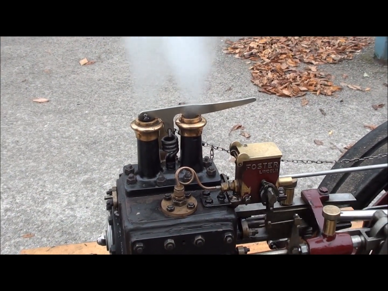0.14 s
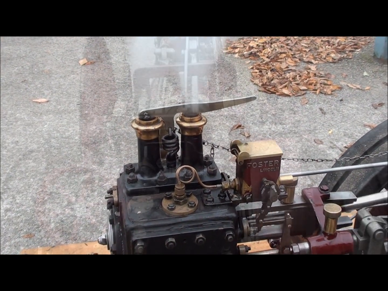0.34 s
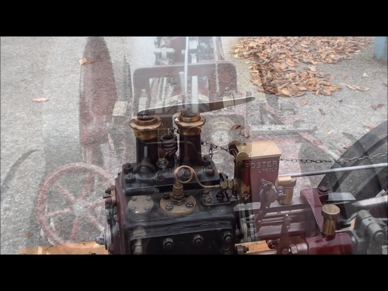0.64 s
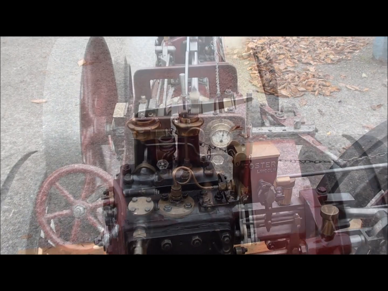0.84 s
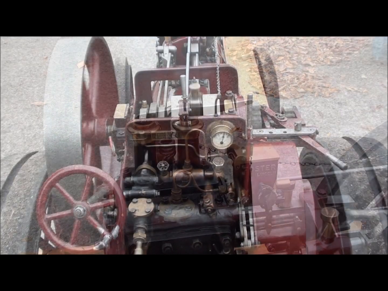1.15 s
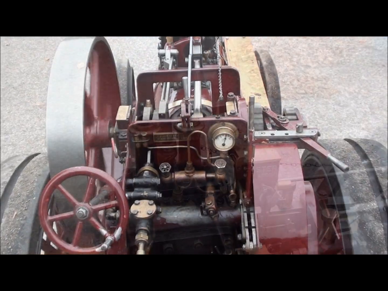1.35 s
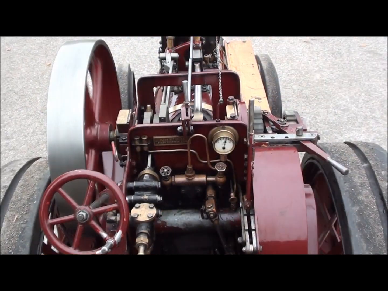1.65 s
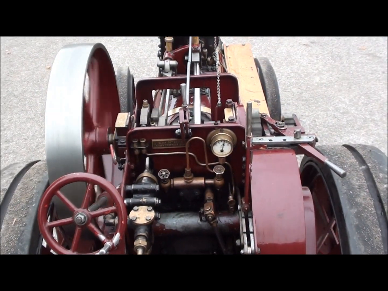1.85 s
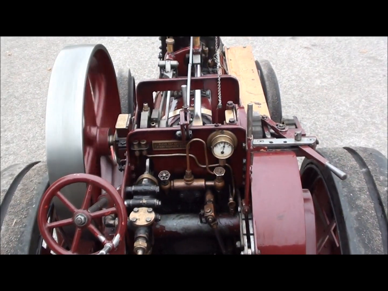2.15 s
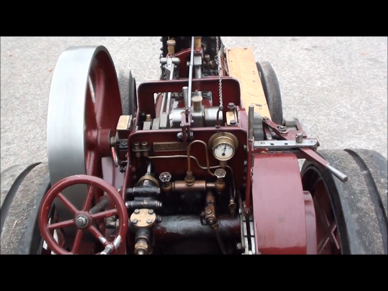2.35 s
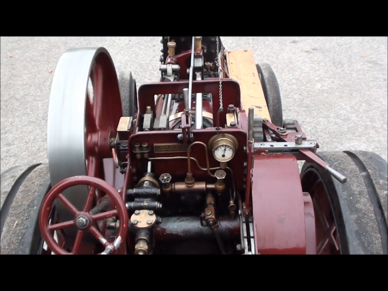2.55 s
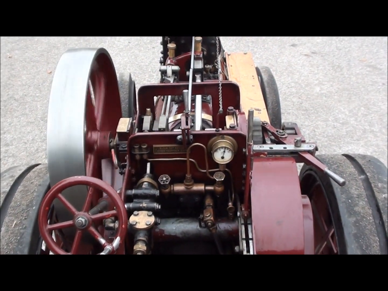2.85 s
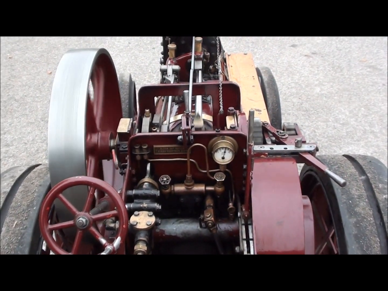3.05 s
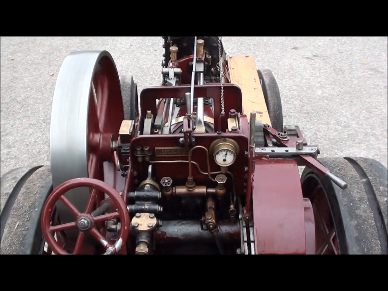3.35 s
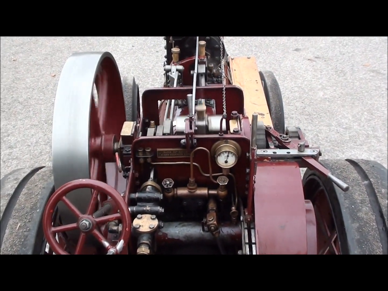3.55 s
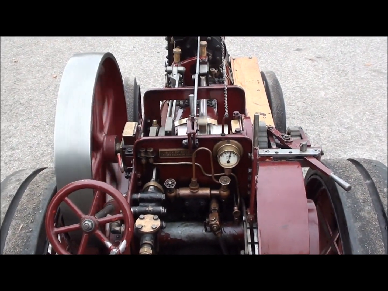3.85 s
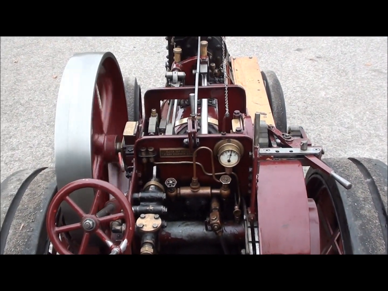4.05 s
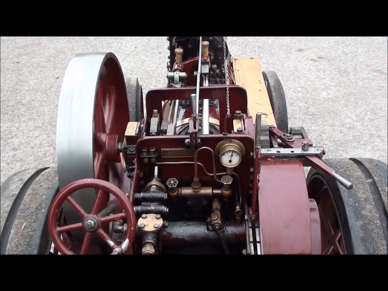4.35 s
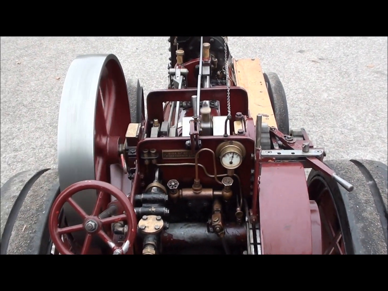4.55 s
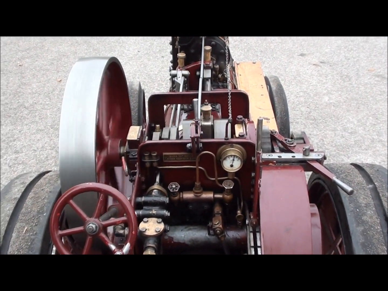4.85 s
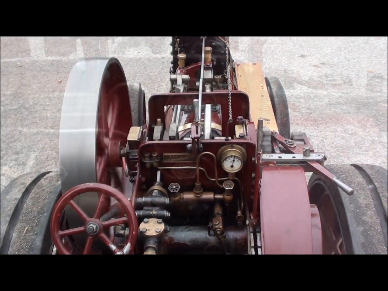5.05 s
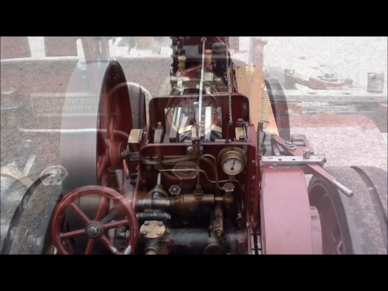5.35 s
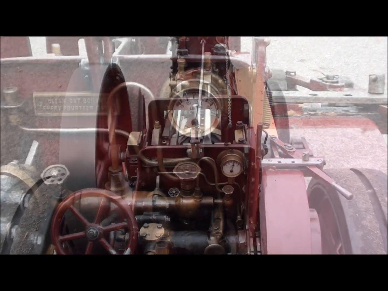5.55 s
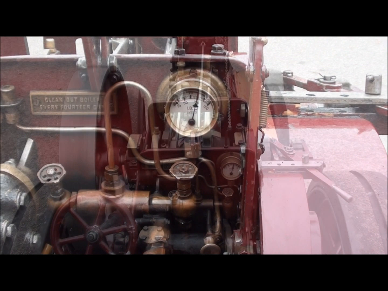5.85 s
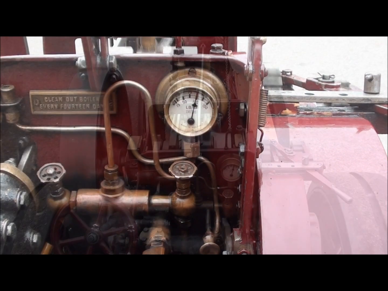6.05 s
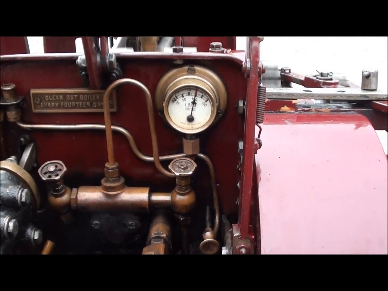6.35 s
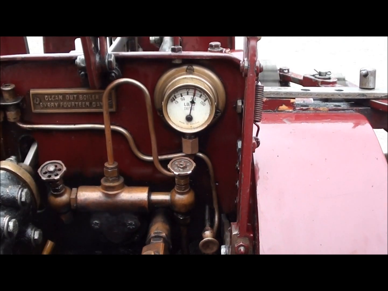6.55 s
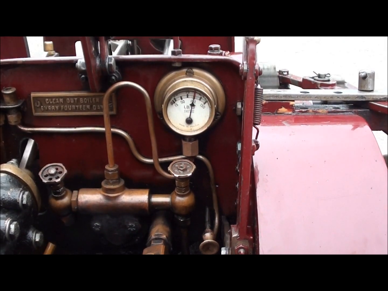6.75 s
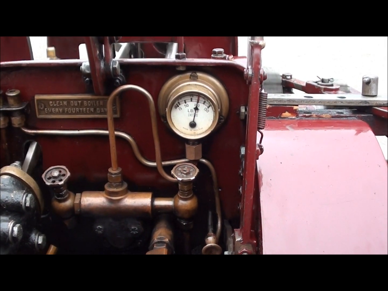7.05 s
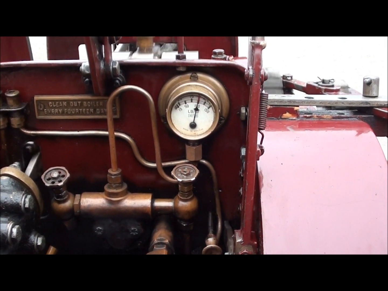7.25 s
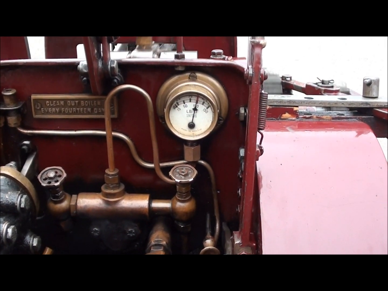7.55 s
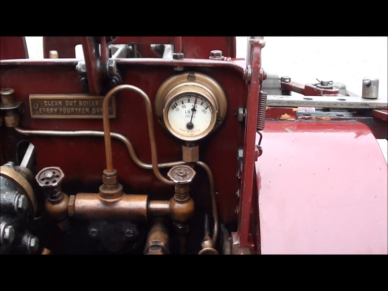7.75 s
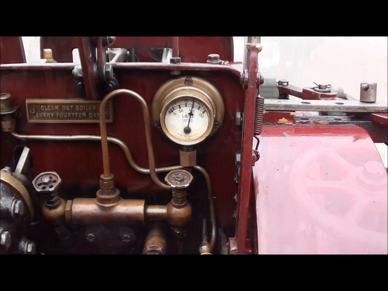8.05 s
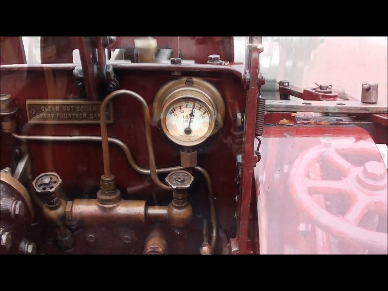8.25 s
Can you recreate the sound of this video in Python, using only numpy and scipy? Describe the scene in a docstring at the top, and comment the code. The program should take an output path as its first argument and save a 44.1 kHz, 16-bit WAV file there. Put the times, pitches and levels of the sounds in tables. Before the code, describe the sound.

Steam hisses steadily from a small outdoor steam engine while its crank knocks in quick, regular metallic clatter, heard from three successive close positions.

```python
"""Steam hisses from the safety valves of a small traction engine ticking over outdoors, its crank knocking.
Steam is shaped random spectra; knocks return at fixed crank angles and ring decaying modes of the iron frame.
Three places are heard in turn, beside the valves, behind the engine and close to the footplate, each
overlapping the next for a second. Breeze is low noise, thuds are low sine bumps; near the footplate a loose
plate clanks, ringing the same modes."""
import sys
import numpy as np
from scipy import signal
from scipy.fft import rfft, irfft, next_fast_len
from scipy.io import wavfile
from scipy.ndimage import uniform_filter1d

SR = 44100
rng = np.random.default_rng(int(sys.argv[2]) if len(sys.argv) > 2 else 0)


def materialize(psi):
    """Save the field psi as 16-bit PCM at rate SR to the path in sys.argv[1].

    A 1-D psi becomes a single channel; in a 2-D psi each row is a channel.
    """
    bounded = np.clip(np.atleast_2d(psi).T, -1, 1)
    quanta = np.round(bounded * 32767).astype(np.int16)
    wavfile.write(sys.argv[1], SR, quanta)


N = 370881


def gain_of(db):
    """Decibels to amplitude gain."""
    return 10 ** (np.asarray(db) / 20)


def evened(x):
    """Scales to rms 1."""
    return x / np.sqrt(np.mean(x ** 2) + 1e-20)


def read(points, hz):
    """Interpolates a spectrum on a log-frequency axis."""
    point_hz, value = np.transpose(points)
    return np.interp(np.log(hz + 1), np.log(point_hz + 1), value)


def add(mix, start_s, sound):
    """Adds a sound at a time in seconds; what lies before zero is lost."""
    at = round(start_s * SR)
    part = mix[max(at, 0):][:max(len(sound) + min(at, 0), 0)]
    part += sound[max(-at, 0):][:len(part)]


# Steam jet. Each row: time in seconds, level in dB, treble against the body in dB.
VALVES_JET = [(0, -11, -1.5), (.4, -11.5, -1.5), (.7, -10, -2), (1.1, -14, 0), (1.55, -12, -2.5),
              (1.77, -10, -1.8)]
BEHIND_JET = [(.76, -10.5, 0.67), (1.4, -12, .8), (1.8, -11.5, 0.58), (2.55, -14, .9), (2.95, -13, .9),
              (3.08, -13.5, -0.94), (3.85, -11.7, 0.93), (4.12, -13.5, -0.39), (5.1, -12.8, -.7),
              (5.4, -12.5, -0.82), (6.47, -12.5, -0.42)]
CLOSE_JET = [(5.45, -15.5, .9), (6.5, -15, -0.24), (6.95, -12, -.7), (7.15, -14.5, 0.61), (7.6, -13, -1),
             (7.9, -13.5, -1.04), (8.15, -15.5, -2.4), (8.41, -14.5, -.3)]
# Jet colour, down to the rumble of fire and gears. Each row: frequency in Hz, relative density in dB.
VALVES_HISS = [(18, -66), (30, -39), (360, -17), (493, -22), (729, -14.5), (1200, -16), (2020, -4.5),
               (2430, -7), (3330, -1.5), (4550, -1), (5910, -10), (7100, -2), (8980, -9.5), (13000, -11.5),
               (15600, -13)]
BEHIND_HISS = [(18, -57), (30, -20.5), (250, -8), (308, -14), (370, -8.5), (493, -12), (711, -9),
               (1600, -9), (2560, -2), (3600, -5.5), (5610, -1), (6070, -1), (10200, -7), (13300, -16),
               (15600, -12)]
CLOSE_HISS = [(18, -57), (30, -31), (225, -6), (370, -10), (480, -13.5), (749, -9.5), (1110, -13),
              (2080, -6), (2370, -9), (2700, -10), (3160, -10.5), (4550, -6.5), (5050, -6.5), (5610, -4),
              (15600, -20.5)]
# Bands that nearby plates and the ground lift or cancel. Each row: centre in Hz, width in Hz, change in dB.
VALVES_BANDS = [(2110, 460, -3), (2480, 260, -8), (3010, 830, 3), (4500, 530, 2), (6000, 520, 1),
                (6660, 870, 3), (8900, 900, -1), (10800, 900, 3), (13200, 900, 4)]
BEHIND_BANDS = [(384, 66, 5), (470, 69, -10), (1000, 840, -0.5), (2680, 360, 0.5), (3280, 450, 4),
                (3880, 300, 2), (4590, 1060, 5), (5600, 350, 3.5), (6050, 160, -4), (6470, 410, 1.5),
                (7300, 490, 3.5), (7970, 260, 4.5), (10000, 1000, -3), (12000, 500, 1), (13150, 1300, 7.5)]
CLOSE_BANDS = [(496, 77, -1), (1200, 820, -1.5), (2140, 590, 3), (2400, 105, -14), (2740, 280, 5.5),
               (3620, 300, -2.5), (3790, 180, 5), (4200, 150, -9), (4530, 460, 6.5), (5680, 300, 2.5),
               (5900, 210, -7), (6550, 330, -4), (7750, 300, 1.5), (10200, 1500, -3.5), (13300, 900, 2)]
# Steam spread between left and right. Each row: frequency in Hz, left-right likeness (0 to 1), left minus right
# in dB.
VALVES_SPREAD = [(90, .97, 0), (350, .96, -.3), (1000, .92, .7), (1500, .9, .6), (2600, .94, 1.4),
                 (3400, .98, 2.2), (4600, .975, 3.9), (5500, .92, 2.3), (6100, .86, 0), (6700, .96, 0),
                 (7900, .997, 0), (15000, .999, 0)]
BEHIND_SPREAD = [(90, .95, 0), (350, .985, 0), (1000, .965, .8), (1500, .98, .1), (2600, .993, .1),
                 (3400, .99, .3), (4000, .97, .9), (5000, .94, 3.8), (5600, .965, 1.4), (6100, .94, .9),
                 (6700, .96, 0), (7900, .997, 0), (15000, .999, 0)]
CLOSE_SPREAD = [(90, .9, .3), (350, .96, .4), (1000, .87, 1.6), (1500, .87, .9), (2000, .91, 1.9),
                (3300, .83, 1.8), (4500, .95, 2.9), (5000, .86, 3.2), (5600, .93, 2.1), (6200, .9, .3),
                (7300, .92, -.4), (8000, .985, 0), (15000, .998, 0)]


def steam(jet, hiss, bands, ports, patchy_db, flicker_db):
    """Turbulent noise as random short-time spectra with drifting patches and a fast shared flicker."""
    frame, hop = 1024, 256  # samples
    frames, hz = N // hop + 5, np.fft.rfftfreq(frame, 1 / SR)
    t = np.arange(frames) * hop / SR
    left_re, left_im, other_re, other_im, patches = rng.standard_normal((frames, len(hz), 5)).T
    patches = uniform_filter1d(patches, size=30, axis=0)
    patches = evened(uniform_filter1d(patches, size=6, axis=1))
    flicker = evened(uniform_filter1d(rng.standard_normal(frames), size=2))

    colour_db = read(hiss, hz)
    for centre_hz, width_hz, db in bands:
        colour_db = colour_db + db * np.exp(-(2 * (hz - centre_hz) / width_hz) ** 2)
    body = (hz > 2000) & (hz < 8000)  # the jet level refers to this band
    colour_db -= 10 * np.log10(np.sum(gain_of(colour_db[body]) ** 2))

    jet_s, level_db, treble_db = np.transpose(jet)
    treble = np.clip((hz - 6000) / 4000, 0, 1)[:, None]
    fizz = np.clip((hz - 1500) / 5000, 0, 1)[:, None]  # the flicker grows with pitch
    field_db = colour_db[:, None] + np.interp(t, jet_s, level_db) + patchy_db * patches
    field_db += treble * np.interp(t, jet_s, treble_db) + fizz * flicker_db * flicker

    port_hz, *columns = np.transpose(ports)
    same, lean_db = (np.interp(np.log(hz + 1), np.log(port_hz), column)[:, None] for column in columns)
    left = left_re + 1j * left_im
    other = other_re + 1j * other_im
    spectra = np.array([left, same * left + np.sqrt(1 - same ** 2) * other])
    spectra *= gain_of([lean_db / 2, -lean_db / 2])
    spectra *= gain_of(field_db) * np.sqrt(3 / 2)  # overlap-add averages frames
    return signal.istft(spectra, nperseg=frame, noverlap=frame - hop)[1][:, :N]


# Modes of frame, firebox plates and motion work. Each row: frequency in Hz, 60 dB decay time in seconds.
FRAME = [(170, 0.15), (215, 0.18), (245, 0.28), (283, 0.16), (345, 0.12), (385, 0.15), (500, 0.047),
         (630, 0.053), (680, 0.078), (750, 0.086), (800, 0.072), (900, 0.09), (960, 0.13), (1090, 0.028),
         (1200, 0.048), (1260, 0.026), (1430, 0.078), (1600, 0.051), (1740, 0.016)]


def knock(chatter_s, rebound_s, rebound_db, ring_db):
    """Bearing slack closes with a short chatter and rebounds once; returns one row a mode."""
    hz, t60_s = np.transpose(FRAME)[:, :, None]
    wait, phase_turns = rng.random((2, len(hz), 1))  # each mode catches its own moment of the chatter
    delay_s = np.array([0, rebound_s])[:, None, None]
    t = np.maximum(np.arange(SR // 4) / SR - delay_s - .5 * chatter_s * wait, 0)
    rise = 1 - np.exp(-t / (0.052 * chatter_s))
    fall = gain_of(-60 * np.maximum(t - chatter_s, 0) / t60_s)
    blow, rebound = rise * fall * np.sin(2 * np.pi * (hz * t + phase_turns))
    return gain_of(ring_db)[:, None] * (blow + gain_of(rebound_db) * rebound)


# Knocks in a turn. Each row: share of the turn, chatter in seconds, rebound delay in seconds, rebound in dB.
KNOCKS = [(-.015, .01, .03, -16), (.122, 0.0056, 0.016, -2.5), (.48, .012, 0.018, -19),
          (0.665, 0.0052, .018, -8.5), (.26, .015, .02, -8.5), (.93, .012, .012, -1)]
# Force on the frame. Each row: one knock; each column: relative level of one mode in dB.
RING = [(-55, -29, -32, -26.5, -22, -19, -39, -33, -31.5, -47, -37, -27.5, -31, -26, -29, -24.5, -30.5, -29, -24),
        (-35, -26.5, -37, -16, -33, -22.5, -24.5, -24, -24, -27.5, -23.5, -27, -23.5, -22.5, -23.5, -31, -29, -22, -24),
        (-45, -29, -31.5, -28, -22, -32, -50, -30.5, -30.5, -33, -33, -34, -37, -24.5, -22.5, -26, -23, -36, -24),
        (-34, -33, -28.5, -25.5, -35, -21, -33, -19, -25.5, -24, -16, -29, -24.5, -32, -35, -46, -32, -27, -23),
        (-37, -37, -36, -34, -31.5, -28.5, -60, -38, -38, -36.5, -44, -40, -62, -59, -44, -47, -49, -54, -57),
        (-47, -48, -38, -46, -53, -38.5, -60, -48, -47, -36, -32.5, -37, -28, -52, -29.5, -34, -31, -38, -45)]
# Crank progress as heard at a place. Each row: time in seconds, turns done.
VALVES_TURNS = [(-.239, 0), (1.978, 7)]
BEHIND_TURNS = [(.811, 0), (3.301, 8), (5.491, 15), (6.735, 19)]
CLOSE_TURNS = [(5.416, 0), (8.548, 10)]
# How each knock arrives at a place. Each row: level in dB, tilt in dB per octave about 600 Hz.
VALVES_REACH = [(-13, -5), (-3.5, 0.5), (-14, .1), (-6.5, 0), (-20, .1), (-20, .1)]
BEHIND_REACH = [(-1.1, .1), (0.17, 0.091), (-0.25, .1), (-0.56, .1), (1.2, 0.11), (-0.16, .1)]
CLOSE_REACH = [(0.5, 1), (-0.1, -2.5), (0.5, -1.5), (-2.4, -2), (-3, -3.5), (2, -4.2)]
# How a place colours the ring. Each row: frequency in Hz, change in dB.
VALVES_IRON = [(170, -12), (215, -32), (283, -12.5), (385, -10), (500, 1), (630, -1), (750, 6.5),
               (800, -16), (960, -4), (1260, -20), (1600, 2), (1740, -33)]
BEHIND_IRON = [(170, 0), (1740, 0)]
CLOSE_IRON = [(170, 9.3), (215, 7.4), (283, 2.7), (345, 4.1), (385, 3.6), (500, 4.7), (650, 8.1),
              (800, 8.7), (900, 4.5), (1200, 1.1), (1430, 7), (1740, 4.3)]


def crank(turns, reach, iron):
    """Knocks return at the same crank angles, each mode a little harder or softer each turn."""
    out = np.zeros(N)
    turn_s, done = np.transpose(turns)
    hz = np.transpose(FRAME)[0]
    iron_db, octaves = read(iron, hz), np.log2(hz / 600)
    for (share, *shape), ring_db, (reach_db, tilt_db) in zip(KNOCKS, RING, reach):
        modes = knock(*shape, iron_db + ring_db + reach_db + tilt_db * octaves)
        starts_s = np.interp(np.arange(done[-1]) + share, done, turn_s)
        chance_db = 2.0 * rng.standard_normal((len(starts_s), len(FRAME)))
        for start_s, each_db in zip(starts_s, chance_db):
            add(out, start_s, gain_of(each_db) @ modes)
    # loose joints keep making and breaking contact, which roughens the ring
    rattle = uniform_filter1d(rng.standard_normal(N), size=90)
    rattle = evened(uniform_filter1d(rattle, size=90))
    rough = 0.29
    return out * (1 + rough * rattle) / np.sqrt(1 + rough ** 2)


def limited(x, threshold_db, depth, detector_fall_db_per_s):
    """The recorder's gain control takes off a share (depth) of the peak-held excess in dB."""
    power = uniform_filter1d((x ** 2).mean(0), size=260)
    power_db = 10 * np.log10(abs(power) + 1e-12)
    fall_db = np.arange(N) * detector_fall_db_per_s / SR
    held_db = np.maximum.accumulate(power_db + fall_db) - fall_db
    excess_db = np.maximum(held_db - threshold_db, 0)
    return x / gain_of(depth * uniform_filter1d(excess_db, size=120))


def place(heard_s, engine, jet, threshold_db):
    """One listening place: engine and steam share the gain control, gated on and off within a few ms."""
    t = np.arange(N) / SR
    from_s, to_s = heard_s
    gate = np.clip(np.minimum(t - from_s, to_s - t) / 0.0029 + .5, 0, 1)
    late = np.roll(engine, 9)  # a slightly longer path to the right port
    pair = np.array([engine, 0.84 * engine + 0.13 * late])
    return gate * limited(pair + jet, threshold_db, depth=0.47, detector_fall_db_per_s=242)


# Wind noise colour. Each row: frequency in Hz, relative level in dB.
BREEZE_COLOUR = [(15, -38), (40, -15), (70, 4), (130, 7), (240, 1), (450, -38)]
# Gusts on the microphone. Each row: peak time in seconds, level in dB, rise and fall time constants in seconds.
GUSTS = [(.9, -38.5, 0.062, 0.55), (3.15, -32, .12, 0.044), (5.6, -30, 0.093, 0.27), (6.2, -36, .15, .4),
         (7.47, -32, .15, .6)]


def breeze():
    """Lumpy low pressure swings, partly unrelated at the two ports, swelling with each gust."""
    size = next_fast_len(N)
    hz, t = np.fft.rfftfreq(size, 1 / SR), np.arange(N) / SR
    spectra = rfft(rng.standard_normal((3, size))) * gain_of(read(BREEZE_COLOUR, hz))
    shared, left, right = irfft(spectra, size)[:, :N]
    level = gain_of(-75)  # calm air
    for peak_s, db, rise_s, fall_s in GUSTS:
        swell = np.minimum((t - peak_s) / rise_s, (peak_s - t) / fall_s)
        level = level + gain_of(db) * np.exp(swell)
    return evened(shared + np.array([left, right])) * level


# Dull thuds. Each row: start in seconds, envelope peak in dB before panning, pitch in Hz, rise in seconds.
THUDS = [(.088, -38, 92, .011), (.406, -38, 92, .011), (.712, -38, 92, .008), (3.139, -23, 75, .007)]


def thuds():
    """Soft low sine bumps, a little stronger on the left."""
    out, t = np.zeros(N), np.arange(SR // 5) / SR
    for start_s, db, hz, rise_s in THUDS:
        envelope = t / rise_s * np.exp(1 - t / rise_s)
        add(out, start_s, gain_of(db) * envelope * np.sin(2 * np.pi * hz * t))
    return gain_of([[1.5], [-1.5]]) * out


# Clanks out of step with the crank. Each row: start in seconds, force in dB.
CLANKS = [(5.482, 4), (5.503, -2), (5.8, -3), (5.822, -2), (5.845, -7), (8.29, -5), (8.318, -1)]
# One clank: chatter in seconds, rebound delay in seconds, rebound in dB.
CLANK_KNOCK = (0.0061, 0.016, -13)
# Relative level of each frame mode in dB.
CLANK_RING = (-47, -29, -42, -40, -36, -42, -23, -15, -17, -14, -14.5, -21, -25, -32, -21, -36, -32, -40,
              -40)


def clanks():
    """A loose plate rattles against the frame and rings its modes."""
    out = np.zeros(N)
    for start_s, force_db in CLANKS:
        add(out, start_s, gain_of(force_db) * knock(*CLANK_KNOCK, CLANK_RING).sum(0))
    return out


def scene():
    """The three overlapping places in turn, with breeze and thuds throughout."""
    patchy_db = .8
    engine = crank(VALVES_TURNS, VALVES_REACH, VALVES_IRON)
    jet = steam(VALVES_JET, VALVES_HISS, VALVES_BANDS, VALVES_SPREAD, patchy_db, flicker_db=0.3)
    valves = place((-1, 1.768), engine, jet, threshold_db=-12.5)

    engine = crank(BEHIND_TURNS, BEHIND_REACH, BEHIND_IRON)
    jet = steam(BEHIND_JET, BEHIND_HISS, BEHIND_BANDS, BEHIND_SPREAD, patchy_db, flicker_db=1.44)
    behind = place((.758, 6.468), engine, jet, threshold_db=-13)

    engine = crank(CLOSE_TURNS, CLOSE_REACH, CLOSE_IRON) + clanks()
    jet = steam(CLOSE_JET, CLOSE_HISS, CLOSE_BANDS, CLOSE_SPREAD, patchy_db, flicker_db=2.1)
    close = place((5.452, 9), engine, jet, threshold_db=-13.5)
    return valves + behind + close + breeze() + thuds()


# Phase between left and right. Each row: frequency in Hz, lead of left over right in radians.
LEAD = [(0, 0), (180, .12), (370, .1), (780, .22), (1500, .08), (2500, .03), (4600, .1), (5250, -.25),
        (7840, 0), (15200, 0)]


def record(dry):
    """Left-right phase lead, bass loss of the capsules, clipping at full scale and a treble limit."""
    size = next_fast_len(N)
    hz = np.fft.rfftfreq(size, 1 / SR)
    side = np.array([[.5], [-.5]])
    ports = np.exp(1j * side * read(LEAD, hz))
    ports *= 1 / np.sqrt(1 + (50 / (hz + 1)) ** 4)  # the capsules lose the deepest bass
    wet = irfft(rfft(dry, size) * ports, size)[:, :N]
    edge_hz = 15650
    lowpass = signal.firwin(511, edge_hz, window=("kaiser", 9), fs=SR)
    wet = signal.oaconvolve(np.clip(wet, -1, 1), lowpass[None], "same")
    return np.clip(wet, -1, 1)


dry = scene()
out = record(dry)
materialize(out)
```